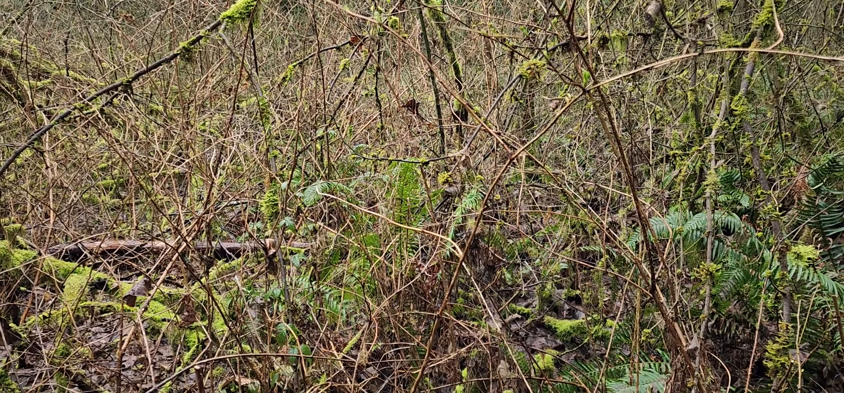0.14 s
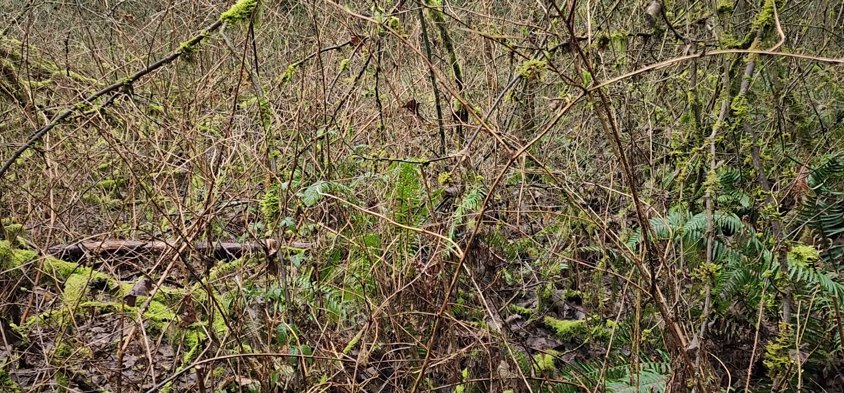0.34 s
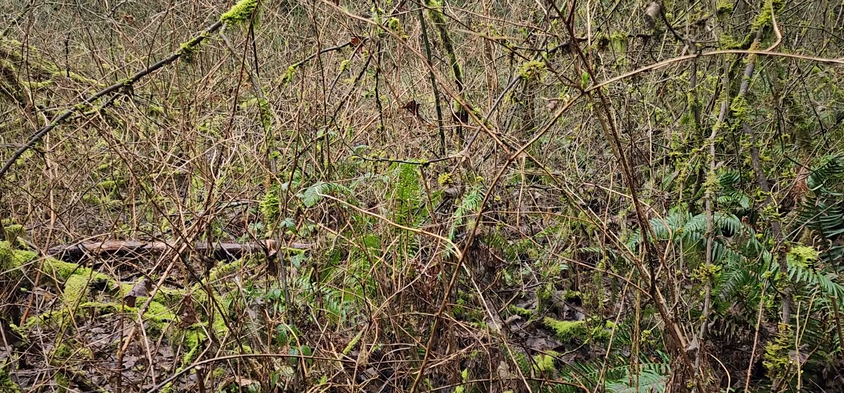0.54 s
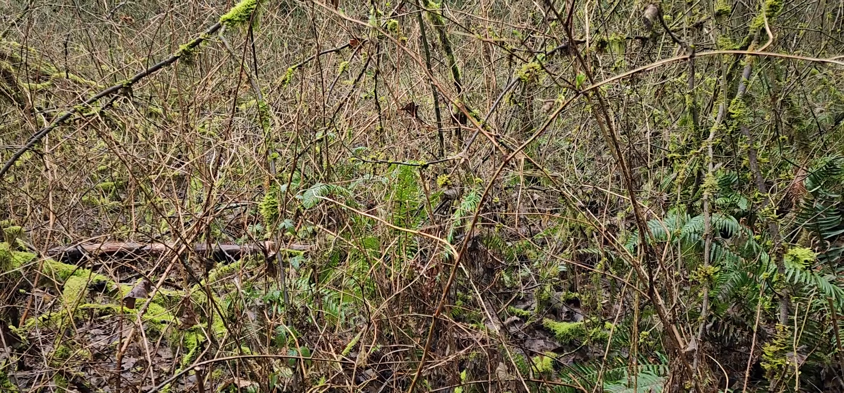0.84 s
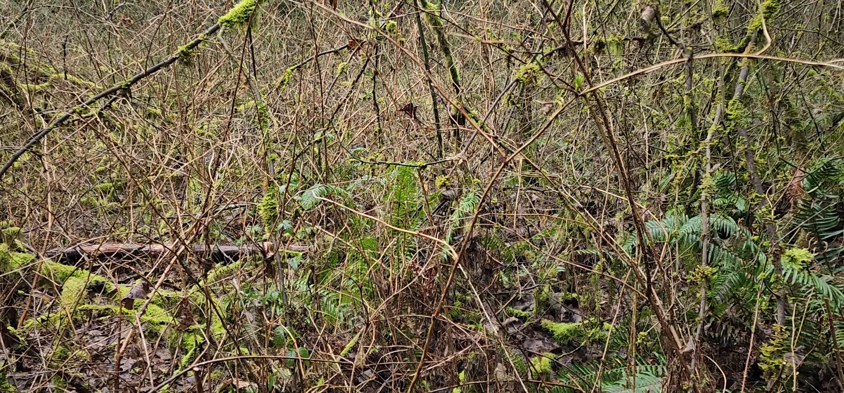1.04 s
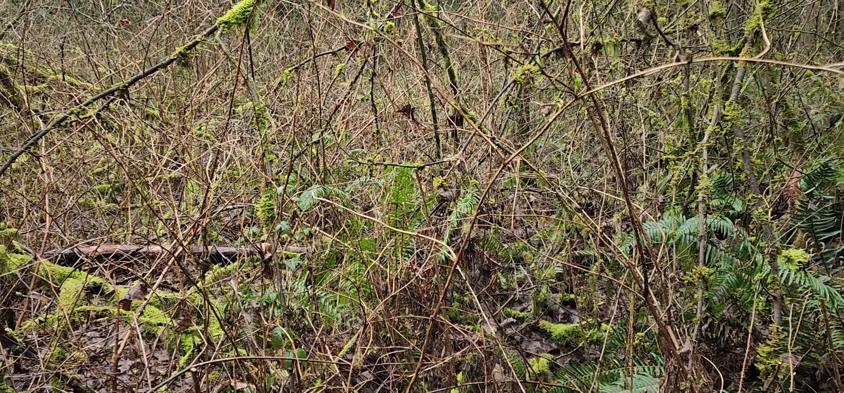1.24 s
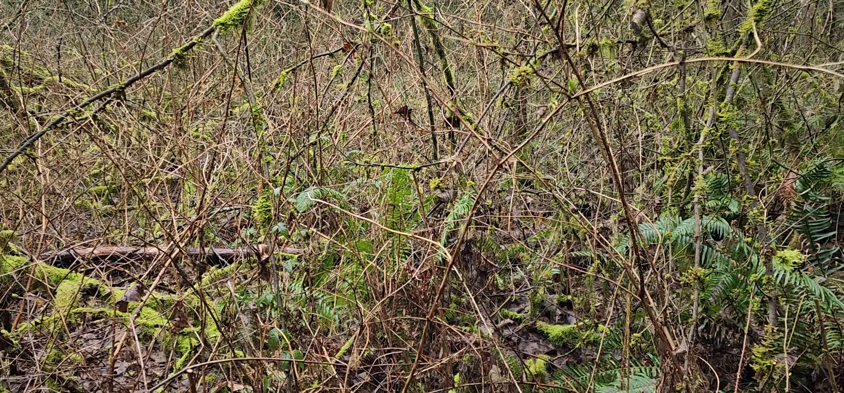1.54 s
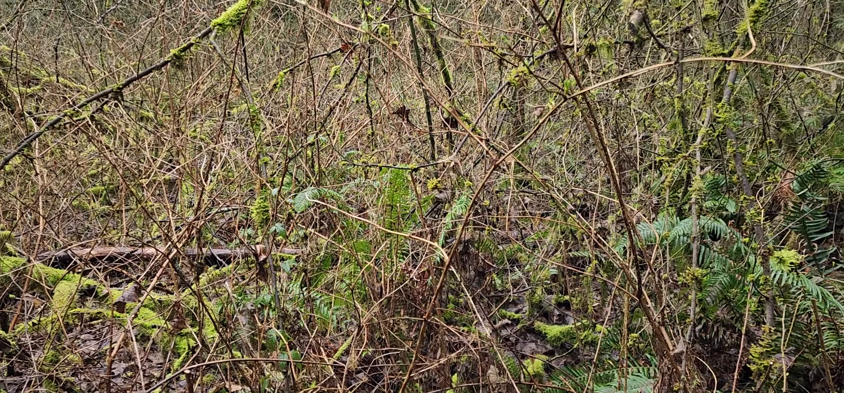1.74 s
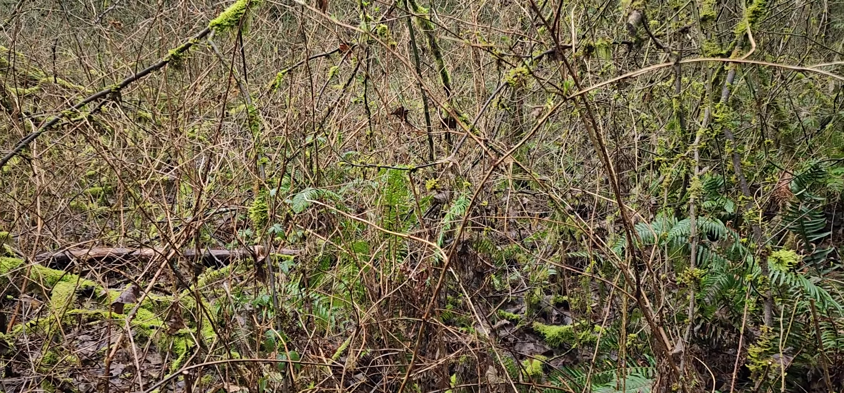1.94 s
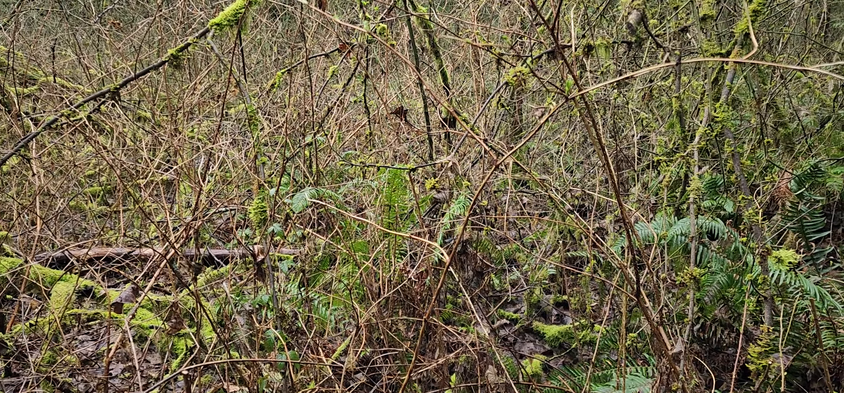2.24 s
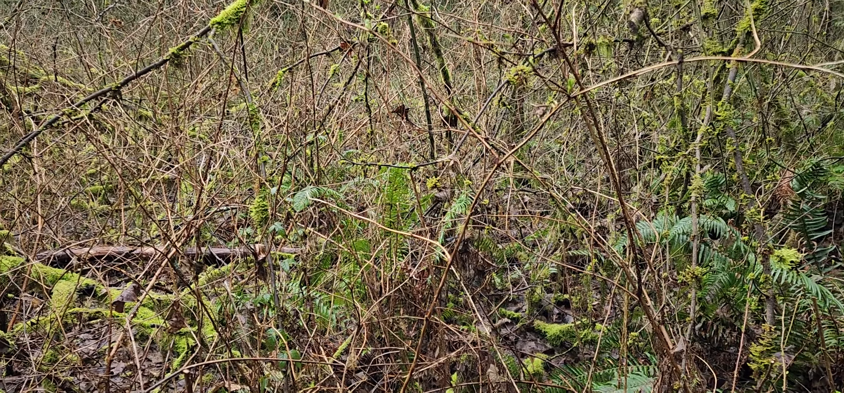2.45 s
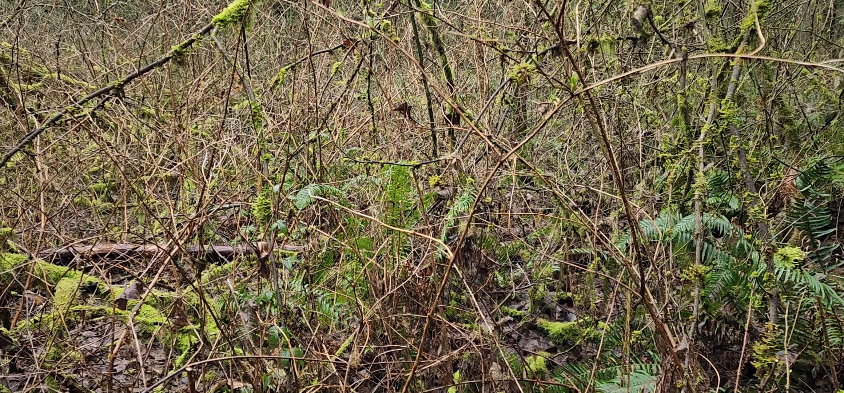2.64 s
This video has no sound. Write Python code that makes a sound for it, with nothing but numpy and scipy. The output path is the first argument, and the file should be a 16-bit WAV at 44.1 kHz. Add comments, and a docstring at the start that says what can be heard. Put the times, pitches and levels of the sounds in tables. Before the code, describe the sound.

Low distant traffic rumble and faint hiss run throughout, with a barely audible thin bird whistle at the start and tiny crisp twig or drip ticks, mostly left, around 0.5-0.8 s. From 0.83 to 1.17 s a frog creaks in rapid dry pulses, rising in pitch, then sputters sparsely until 1.46 s. After a pause, another frog trills evenly from 2.25 s, climbing and fading by 2.75 s; short woody echoes follow.

```python
"""Two frogs in a wet thicket

One small frog creaks in uneven pulses, the other gives an even, rising trill: short pings at the modes of
sac and throat. Stems and trunks scatter the calls (decaying noise tails). Twigs and drips tick nearby
(filtered noise bursts), thin birds whistle far off (gliding sines), and distant traffic rumbles under a
soft hiss (coloured noise)."""
import sys
import numpy as np
from scipy import signal
from scipy.fft import rfft, irfft
from scipy.io import wavfile
from scipy.ndimage import uniform_filter1d, map_coordinates

SR = 44100
rng = np.random.default_rng(int(sys.argv[2]) if len(sys.argv) > 2 else 0)


def put_to_file(sound):
    """Save the sound as 16-bit audio at rate SR, in the file named by the first command-line argument."""
    columns = np.atleast_2d(sound).T  # one column per channel
    safe = np.clip(columns, -1, 1)
    whole_steps = np.round(safe * 32767)
    wavfile.write(sys.argv[1], SR, whole_steps.astype(np.int16))


def how_loud(loudness_db):
    """Turn decibels into a plain amplitude multiplier (0 dB gives 1, 20 dB gives 10)."""
    steps = np.asarray(loudness_db, float) / 20
    return 10 ** steps


N = 123921
T = np.arange(N) / SR


def table(rows, x, log=False):
    """Columns of a table interpolated at x, on a linear or log axis."""
    r = np.array(rows, float)
    axis = np.log if log else np.asarray
    points = axis(np.maximum(r[:, 0], 1e-3))
    return [np.interp(axis(x), points, column) for column in r[:, 1:].T]


def walk(rate_hz):
    """Slow random curve with spread 1: held noise, smoothed twice."""
    k = int(SR / rate_hz)
    w = np.repeat(rng.standard_normal(N // k + 1), k)
    w = uniform_filter1d(uniform_filter1d(w, k), k)[:N]
    return w / w.std()


def pan_gains(left_over_right_db):
    """Left and right gains, half the difference each way."""
    return how_loud(np.array([[left_over_right_db], [-left_over_right_db]]) / 2)


def ping(start_s, pitch_hz, peak_db, rise_s):
    """A mode that swells roundly to its peak at rise_s and dies within a few ms."""
    out, i = np.zeros(N), int(start_s * SR)
    u = (T[i:i + int(.03 * SR)] - start_s).clip(0) / rise_s
    envelope = (u * np.exp(1 - u)) ** 2
    out[i:i + len(u)] = how_loud(peak_db) * envelope * np.sin(2 * np.pi * pitch_hz * rise_s * u)
    return out


THICKET_T60_S, THICKET_BUILD_S = .19, .003


def place(direct, scattered, pan_db, left_lag_s):
    """Direct sound offset in time between sides; the thicket returns a different noise tail to each."""
    t = T[:int(.4 * SR)]
    decay = np.exp(-np.log(1000) * t / THICKET_T60_S)
    build = 1 - np.exp(-t / THICKET_BUILD_S)
    tail = rng.standard_normal((2, len(t))) * decay * build
    tail /= np.sqrt(np.sum(tail ** 2, axis=1, keepdims=True))  # unit energy
    left = map_coordinates(direct, [(T - left_lag_s) * SR])
    both = np.array([left, direct])
    both = both + signal.fftconvolve(scattered[None], tail, axes=1)[:, :N]
    return both * pan_gains(pan_db)


AIR_DB = -44  # rms of the shared part before the swells
RUMBLE_TOP_HZ, HISS_FROM_HZ, FLICKER_DB = 145, 4000, 1.88
# shared spectrum: freq_hz, relative_db
AIR_SPECTRUM = [(12, -50), (20, -16), (32, -11), (68, -5), (90, -3.5), (112, -6), (134, -13), (174, -11),
                (198, -11.5), (226, -13), (264, -13.5), (288, -15.5), (358, -18.5), (399, -19.5),
                (455, -20), (497, -18.5), (690, -17.5), (839, -19), (1070, -25.5), (1240, -26),
                (1480, -28.5), (1760, -32), (2300, -37.5), (2900, -45.5), (3500, -46.5), (4100, -53),
                (4600, -56.5), (5400, -52.5), (5800, -49), (6200, -53), (6900, -61.5), (7400, -55),
                (8000, -56), (8450, -57), (8800, -65), (9300, -83.5), (10500, -77.5), (11500, -74.5),
                (15500, -75)]
# left-right difference part: freq_hz, side_over_shared_db
AIR_SIDE = [(60, -16), (94, -15.5), (150, -16), (230, -11.5), (350, -4.5), (550, -4), (860, 4.5),
            (1340, 4.5), (2090, -2), (3260, -0.1)]
# balance: freq_hz, left_over_right_db
AIR_BALANCE = [(60, 0.5), (230, 1), (550, 1.6), (1340, 0.88), (2090, 0.67), (4500, 1.6), (5000, 9),
               (5800, 12), (6300, 12), (7100, 4.6), (7900, 7.4), (8800, 9), (9600, 0.1), (15500, 1.1)]
# swells, used relative to their means: time_s, rumble_db, hiss_db
SWELL = [(0.0, -52.5, -78.5), (0.19, -43.5, -78.5), (0.63, -47.5, -77), (0.95, -44.5, -75.5),
         (1.1, -48.5, -72), (1.42, -42.5, -78.5), (1.75, -45.5, -78.5), (2.07, -45.5, -78.5),
         (2.35, -47, -77.5), (2.63, -48, -75), (2.81, -52, -77)]


def air():
    """Coloured noise, alike left and right in the bass; rumble and hiss swell on their own."""
    f = np.maximum(np.fft.rfftfreq(N, 1 / SR), 1)
    shared_db, = table(AIR_SPECTRUM, f, True)
    side_db, = table(AIR_SIDE, f, True)
    balance_db, = table(AIR_BALANCE, f, True)
    # the balance sets how far the side part correlates with the shared part
    s, power_ratio = how_loud(side_db), how_loud(2 * balance_db)
    like = (power_ratio - 1) / (power_ratio + 1) * (1 + s * s) / (2 * s)
    like = like.clip(-.95, .95)
    shared, own = rfft(rng.standard_normal((2, N)))
    side = s * (like * shared + np.sqrt(1 - like ** 2) * own)
    spectrum = how_loud(shared_db) * np.array([shared + side, shared - side])
    spectrum *= how_loud(AIR_DB) / irfft(how_loud(shared_db) * shared, N).std()

    low = 1 / (1 + (f / RUMBLE_TOP_HZ) ** 8)
    high = 1 / (1 + (HISS_FROM_HZ / f) ** 8)
    bands = (low, 1 - low - high, high)
    rumble_db, hiss_db = table(SWELL, T)
    gains_db = (rumble_db - rumble_db.mean(),
                FLICKER_DB / 2 * walk(2.03),
                hiss_db - hiss_db.mean() + FLICKER_DB * walk(11.64))
    return sum(irfft(spectrum * band, N) * how_loud(db) for band, db in zip(bands, gains_db))


BIRD_FLUTTER_DB = 4
# whistles before flutter: start_s, length_s, first_hz, last_hz, level_db, left_over_right_db
BIRDS = [(.025, .18, 7650, 7400, -83, 8), (.826, .022, 7150, 7250, -80, 3), (.85, .03, 7250, 7350, -82, 3),
         (2.33, .17, 7600, 7500, -92, 6)]


def birds():
    """Thin gliding sines whose pitch wavers and level flutters from the distance."""
    out = 0
    for start_s, length_s, first_hz, last_hz, level_db, pan_db in BIRDS:
        u = ((T - start_s) / length_s).clip(0, 1)
        hz = (first_hz + (last_hz - first_hz) * u) * (1 + 0.015 * walk(50))
        envelope = np.sqrt(np.sin(np.pi * u).clip(0))
        tone = np.sin(2 * np.pi * np.cumsum(hz) / SR) * envelope
        out = out + tone * how_loud(level_db + BIRD_FLUTTER_DB * walk(50.1)) * pan_gains(pan_db)
    return out


# soft knock: start_s, pitch_hz, peak_db, rise_s
KNOCK = (0.969, 560, -46, .002)


def knock():
    """One soft low ping."""
    return ping(*KNOCK)


TICK_DECAY_S, TICK_TAIL_DECAY_S, TICK_TAIL_DB = .001, .02, -27
# ticks, level before the band filters:
# start_s, level_db, left_over_right_db, lower_band_over_high_db, lower_band_hz
TICKS = [(0.0545, -64, 14, -20, 8000), (0.52, -88, 4, 15, 5000), (0.527, -78, 0, -14, 8000),
         (0.5868, -71.5, 11, 25, 7400), (0.6393, -81, -1, 28, 6100), (0.6798, -54, 11, -12, 8500),
         (0.749, -62.5, 14, -20, 8600), (0.7662, -68, 3, -16, 8500), (0.7776, -53, 4, -19, 8500),
         (0.7857, -81, 5, -14, 8500), (1.061, -61, 0, 6, 8400), (1.2035, -62, 7, 29, 5550),
         (1.2146, -68, -8, 17, 8900), (2.475, -81, -9, 18, 8000), (2.603, -51, 7.5, 12, 5540),
         (2.6895, -61, 13.5, 11, 7200)]


def ticks():
    """Twigs and drips: brief noise crackles with a faint tail, in a high band and a lower one."""
    high = signal.butter(3, [10500, 16500], "bandpass", fs=SR, output="sos")
    out = np.zeros((2, N))
    t = T[:int(.08 * SR)]
    envelope = np.exp(-t / TICK_DECAY_S) + how_loud(TICK_TAIL_DB) * np.exp(-t / TICK_TAIL_DECAY_S)
    for start_s, level_db, pan_db, lower_db, lower_hz in TICKS:
        lower = signal.butter(2, [lower_hz / 1.15, lower_hz * 1.15], "bandpass", fs=SR, output="sos")
        noise = rng.standard_normal((3, len(t)))
        burst = (noise[0] + noise[1:]) / 2 * envelope  # half shared, half own to each side
        crackle = signal.sosfilt(high, burst) + how_loud(lower_db) * signal.sosfilt(lower, burst)
        i = int(start_s * SR)
        out[:, i:i + len(t)] += (how_loud(level_db) * crackle * pan_gains(pan_db))[:, :N - i]
    return out


CREAK_RISE_S, CREAK_PAN_DB, CREAK_LEFT_LAG_S = .0016, 1, -0.000059
SAC_RING_RISE_S, RING_HZ, RING_FOLLOWS = .002, 2550, .8
# throat pulses, levels before mode levels and pan:
# start_s, level_db, sac_pitch_hz, upper_modes_db, scatter_db
CREAKS = [(0.8295, -54, 2600, -3, 3), (0.848, -48.5, 2520, 0, 2), (0.8692, -45.5, 2565, -4, 5),
          (0.89, -47, 2520, 3, 5.5), (0.9076, -59, 2620, -12, 9), (0.9285, -51, 2600, -5, 3),
          (0.9518, -40, 2694, -14, 5), (0.972, -48, 2780, -5, -8), (0.9936, -40.5, 2750, -6, -0.5),
          (1.0154, -41.5, 2890, -9, -4), (1.0345, -43, 2920, -9, -2), (1.053, -41.5, 2750, -1.5, 2),
          (1.0781, -41, 3010, -10, -7), (1.0963, -41.5, 3040, -9, -11), (1.1141, -41, 2970, -5, -2),
          (1.1366, -40.5, 3053, -15, -1.5), (1.1715, -62, 2990, 1, 20.5), (1.273, -55.5, 2930, -5, 5),
          (1.2949, -41.5, 3035, -7.5, -9), (1.3371, -45.5, 3100, -5, -1), (1.4167, -46.5, 3120, -10, -3.5),
          (1.4559, -51.5, 3100, -1, 1)]
# modes: multiple_of_sac_pitch, level_db, is_upper (1 or 0)
CREAK_MODES = [(.51, -10, 0), (1, 2, 0), (1.18, -2, 1), (1.34, -11, 1), (1.47, -15, 1)]


def creaking_frog():
    """Each pulse rings the vocal sac and its upper modes; the sac ring lingers among the stems."""
    direct, scattered = 0, 0
    for start_s, level_db, sac_hz, upper_db, scatter_db in CREAKS:
        for multiple, mode_db, is_upper in CREAK_MODES:
            mode_level_db = level_db + mode_db + is_upper * upper_db
            direct = direct + ping(start_s, sac_hz * multiple, mode_level_db, CREAK_RISE_S)
        ring_hz = RING_HZ + RING_FOLLOWS * (sac_hz - RING_HZ)
        scattered = scattered + ping(start_s, ring_hz, level_db + scatter_db, SAC_RING_RISE_S)
    return place(direct, scattered, CREAK_PAN_DB, CREAK_LEFT_LAG_S)


TRILL_START_S, TRILL_PERIOD_S, TRILL_SLOWER_S = 2.2468, .01843, .0012
TRILL_PULSES, TRILL_SLOWS_AT_PULSE = 26, 19
TRILL_RISE_S, HALF_RISE_S = .0016, .002
THROAT_HZ, HALF_TOP_HZ = (2055, 3386), 1350
PULSE_SPREAD_DB, PITCH_SPREAD_RATIO = 1.2, .011
TRILL_PAN_DB, TRILL_LEFT_LAG_S, TRILL_SCATTER_DB = 2, -0.000082, -4.5
# course of the trill before pulse spread and pan:
# time_s, sac_pitch_hz, sac_db, half_pitch_db, low_throat_db, high_throat_db
TRILL = [(2.247, 2080, -44.5, -54, -51, -62), (2.265, 2350, -41, -44, -54, -60),
         (2.30, 2680, -42, -39, -51, -56), (2.36, 2450, -38, -44, -50.5, -56.5),
         (2.449, 2770, -40, -41, -50, -49.5), (2.55, 2680, -44, -43.5, -52, -51.5),
         (2.617, 2780, -43.5, -46, -45.5, -46.5), (2.636, 3080, -39, -45.5, -50, -68),
         (2.66, 3000, -46, -51, -47.5, -53), (2.72, 3080, -48, -58, -55, -49.5)]


def trilling_frog():
    """Even pulses, slower near the end; sac pitch and its half climb, two throat modes stay."""
    n = np.arange(TRILL_PULSES)
    slowing_s = TRILL_SLOWER_S * np.maximum(n - TRILL_SLOWS_AT_PULSE, 0)
    times_s = TRILL_START_S + TRILL_PERIOD_S * n + slowing_s
    chance = rng.standard_normal((TRILL_PULSES, 8))
    modes = np.zeros((4, N))
    rises_s = (TRILL_RISE_S, HALF_RISE_S, TRILL_RISE_S, TRILL_RISE_S)
    for start_s, c, (sac_hz, *levels_db) in zip(times_s, chance, zip(*table(TRILL, times_s))):
        modes_hz = (sac_hz, min(sac_hz / 2, HALF_TOP_HZ), *THROAT_HZ)
        for k in range(4):
            hz = modes_hz[k] * (1 + PITCH_SPREAD_RATIO * c[k])
            db = levels_db[k] + PULSE_SPREAD_DB * c[4 + k]
            modes[k] += ping(start_s, hz, db, rises_s[k])
    scattered = modes[0] + how_loud(-3) * modes[1:].sum(axis=0)  # the sac ring scatters most
    scattered = scattered * how_loud(TRILL_SCATTER_DB)
    return place(modes.sum(axis=0), scattered, TRILL_PAN_DB, TRILL_LEFT_LAG_S)


def scene():
    """All sources together."""
    return air() + birds() + knock() + ticks() + creaking_frog() + trilling_frog()


def band_limit(x):
    """A steep low-pass at the top of the band."""
    return signal.sosfilt(signal.butter(12, 15830, fs=SR, output="sos"), x)


def record(dry):
    """The finished mix."""
    return band_limit(dry)


dry = scene()
out = record(dry)
put_to_file(out)
```